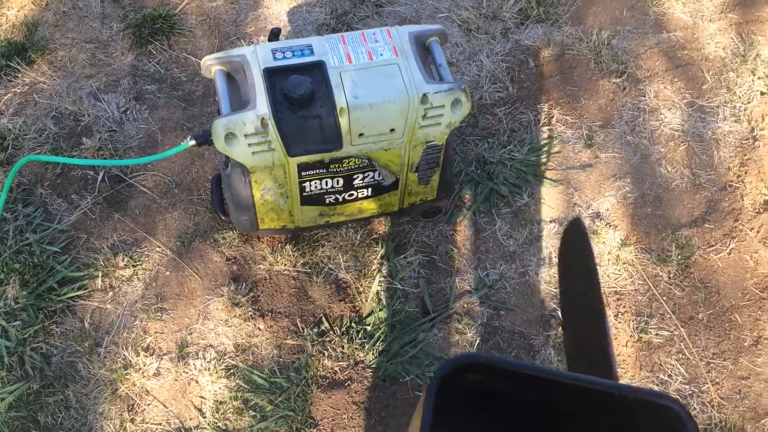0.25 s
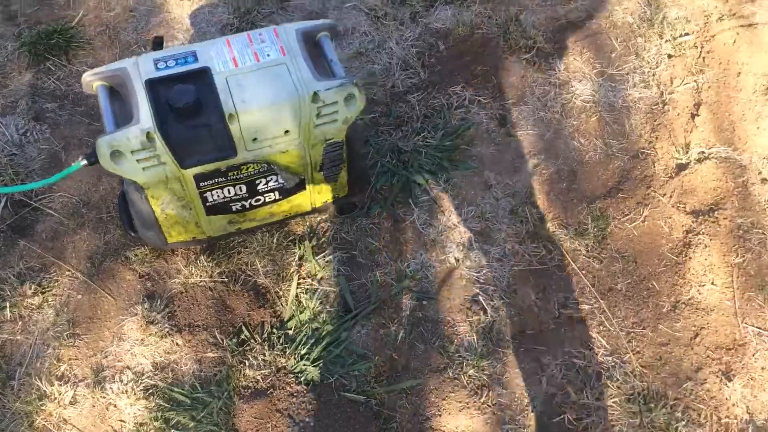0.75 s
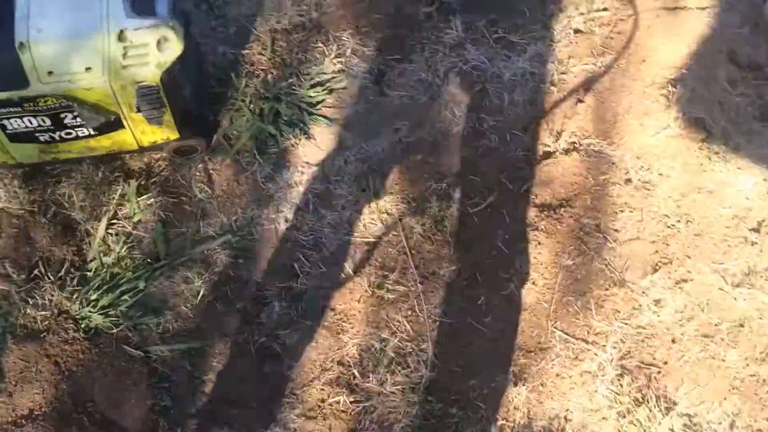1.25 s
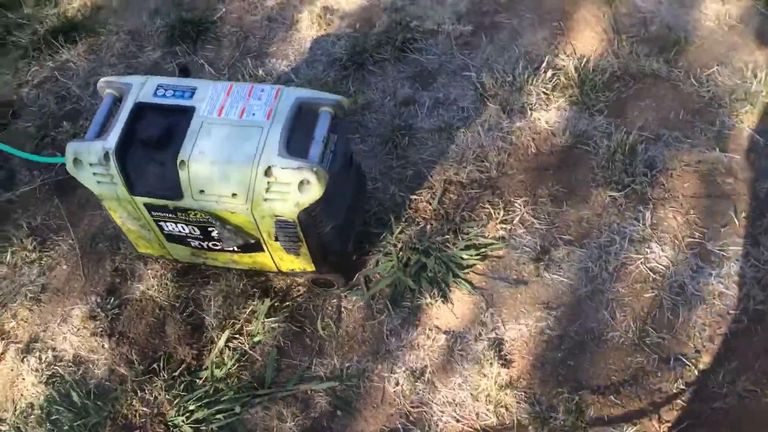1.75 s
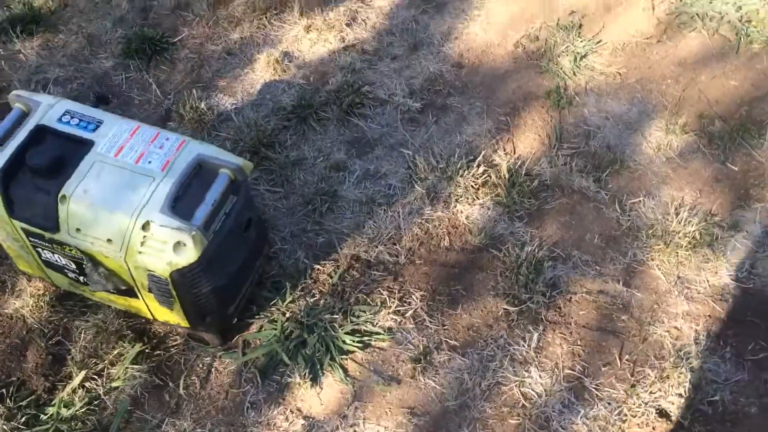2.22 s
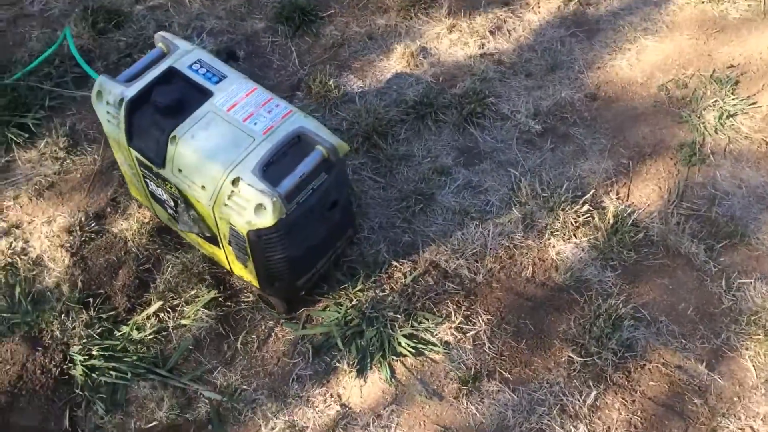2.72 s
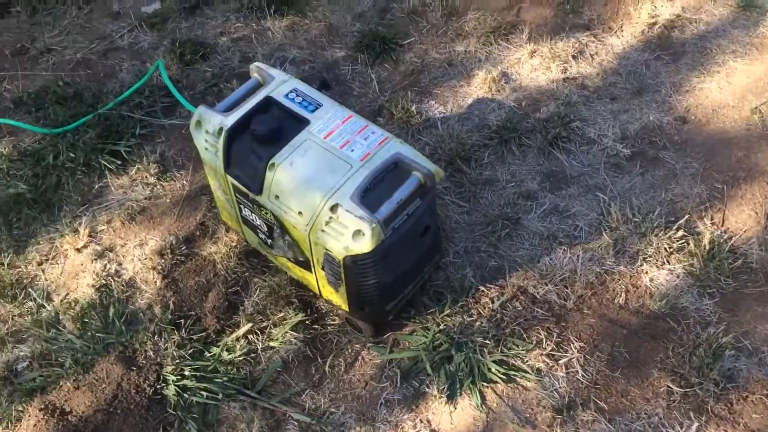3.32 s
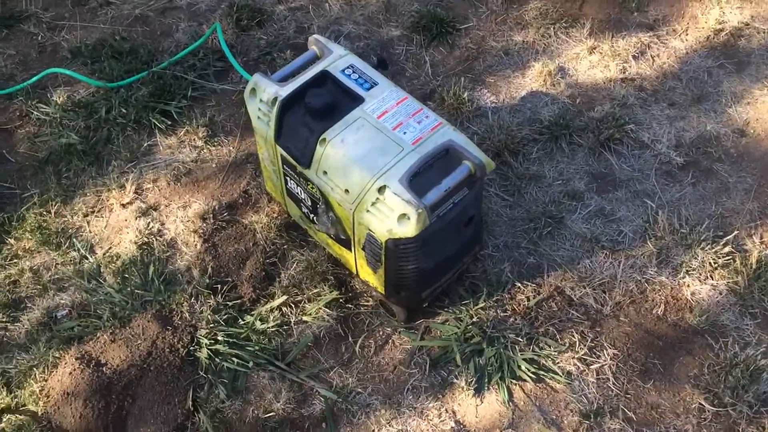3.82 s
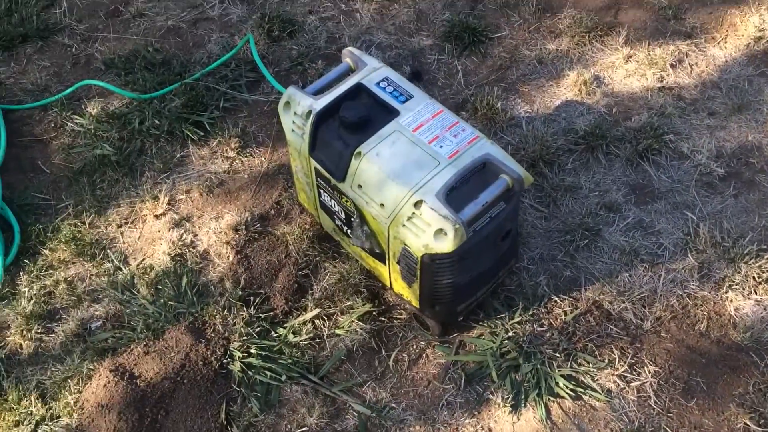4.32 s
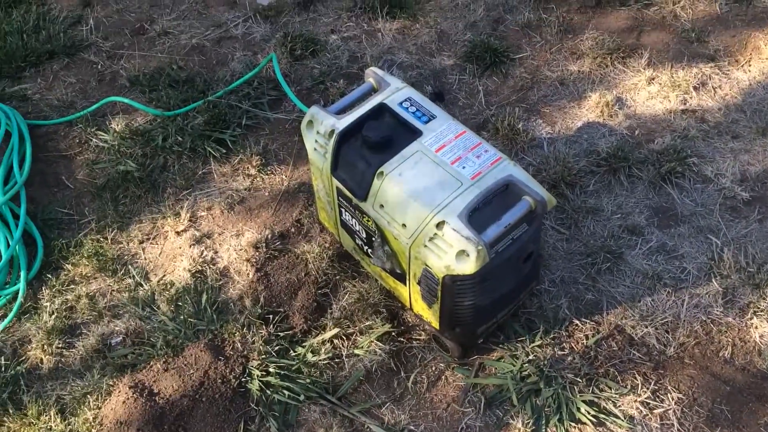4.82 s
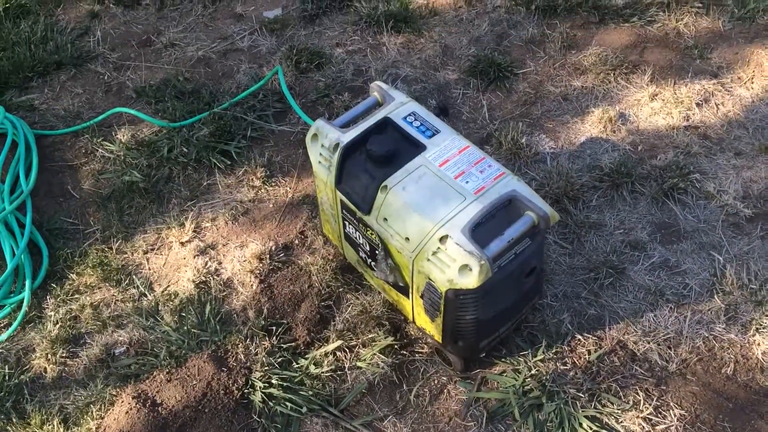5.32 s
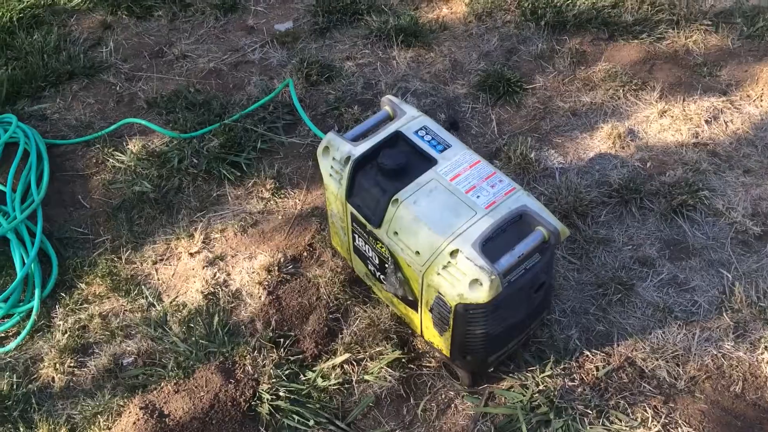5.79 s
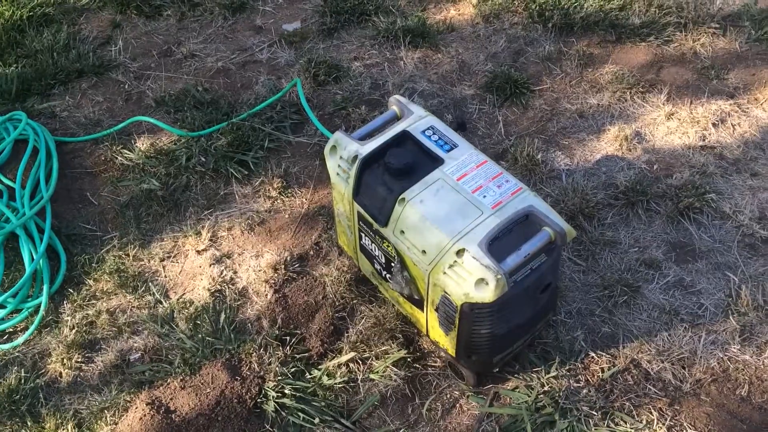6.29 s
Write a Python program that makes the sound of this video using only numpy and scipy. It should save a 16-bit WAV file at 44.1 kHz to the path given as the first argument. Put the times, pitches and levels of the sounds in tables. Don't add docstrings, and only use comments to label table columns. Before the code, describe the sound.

Outdoors on dry ground, a small petrol engine purrs fast with light metallic knocks and breathy air. Over it an electric saw's hard, nasal whine coasts downward, chain clatter slowing and fan rush dulling until only the engine remains. After a short rest the saw snatches on, sweeps up to its former pitch and holds, bright and loud, the loaded engine labouring then settling. Close handheld mono microphone, no echo.

```python
import sys
import numpy as np
from scipy import signal
from scipy.io import wavfile
from scipy.ndimage import uniform_filter1d

SR = 44100
rng = np.random.default_rng(int(sys.argv[2]) if len(sys.argv) > 2 else 0)


def dump(signal):
    limited = np.clip(np.atleast_2d(signal).T, -1, 1)
    pcm = np.round(limited * 32767).astype(np.int16)
    wavfile.write(sys.argv[1], SR, pcm)


def linear_from_db(decibels):
    return 10 ** (np.asarray(decibels, float) / 20)


N = 288855
T = np.arange(N) / SR

# time in seconds, firings per second.
FIRING = [(0, 34.6), (.14, 37.5), (.34, 38.8), (.8, 30.9), (1.07, 35.4), (1.2, 35.2), (1.38, 33.5),
          (1.6, 35.4), (2.1, 35.9), (3.26, 35.2), (3.41, 31.2), (3.6, 29), (3.83, 32.4), (4.1, 35.3),
          (4.55, 37.2), (5.25, 36.8), (5.41, 35.3), (5.71, 36.25)]
# time in seconds, load (0 idle, 1 steady, 2 labouring), overall level change in dB.
THROTTLE = [(0, 0.5, -7), (.5, 0.53, -2.5), (.9, 1.76, -1.7), (1.3, .08, -4), (1.8, .2, 0.1),
            (2.3, .02, 0.5), (3.25, 0.089, 0.7), (3.44, 1.75, 3), (3.6, 1.93, 1), (4.0, 1.75, 0.5),
            (4.3, 1.07, 1.3), (5.3, 0.97, -0.5), (5.45, 1.22, 2), (5.8, 1.04, 0), (6.55, 1.12, 0.5)]
# multiple of the firing rate, level in dB.
IDLE_ORDERS = [(1, -19), (2, -1), (3, -13), (4, 0), (5, -3), (6, -7), (7, -8), (8, -5), (9, -13), (10, -10),
               (11, -10), (12, -11)]
STEADY_ORDERS = [(1, -38), (2, -1), (3, -18), (4, -9.5), (5, -2.5), (6, -9), (7, -26), (8, -6), (9, -8),
                 (10, -20), (11, -14.5), (12, -4.5)]
LABOUR_ORDERS = [(1, -34), (2, -23), (3, -15), (4, -7), (5, -9.5), (6, -4.5), (7, 3), (8, -20), (9, -15),
                 (10, -7), (11, -16), (12, -10)]
# share of the cycle, frequency in Hz, width in Hz, level in dB.
KNOCKS = [(.06, 1270, 160, 3.5), (.1, 760, 200, -4), (.16, 2350, 220, -1), (.29, 2405, 254, 1.5),
          (.4, 646, 112, -4.5), (.4, 3480, 200, -18), (.48, 1180, 202, -4.5), (.54, 2300, 250, -4.5),
          (.87, 3460, 149, -6.5), (.93, 1426, 198, 0.5)]
# share of the cycle, level in dB.
PUFFS = [(.36, 8), (.48, -9), (.7, 1), (.92, -8)]
# frequency in Hz, density in dB per Hz.
BREATH = [(15, -44), (25, -25), (54, -2), (147, -11), (575, -8), (640, -9), (1010, -7.5), (1320, -7.5),
          (2020, -12.5), (2380, -12.5), (4290, -20), (8600, -24), (9580, -20), (15100, -30)]
# frequency in Hz, width in Hz, gain in dB.
COVER = [(160, 72, 5.5), (565, 63, -3), (1170, 240, -6.5), (2070, 180, -10), (2350, 200, 3),
         (3160, 200, -7), (3670, 160, 4.5), (7040, 200, 4.5), (8540, 900, -2), (9600, 300, 3)]
EXHAUST_DB, CASING_DB = [-36.5, -36.5, -28.5], [-31, -36.5, -30.5]

# multiple of the whine, dB in the first hold, dB in the second hold,
# dB per octave of speed, dB of motor strain.
WHINE_LAW = [(1, -22.5, -22, 14.5, 14), (.5, -47, -35, 10, -10), (3, -34, -41, 5, 9),
             (5, -35, -33.5, 11, -15), (1.5, -39.5, -43, 5, 3), (10, -42, -41, 17, 9),
             (11, -42, -42, 17, 0)]
# frequency in Hz, width in Hz, gain in dB.
WHINE_PEAKS = [
    [(895, 170, 5.5)],
    [(416, 45, 18)],
    [(2570, 400, 4), (1910, 600, 4), (950, 250, 6)],
    [(4520, 290, 6.5), (3500, 1100, -8), (2720, 240, 16), (2300, 170, 7)],
    [(1160, 200, 16.5)],
    [(8400, 900, 12), (9300, 120, 1)],
    [(10200, 330, 9)],
]
POWERED = [0.83, 0.22, 0.034, 1, 0.79, 1, 1]
# level flutter in dB, phase flutter in radians.
UNSTEADY = [(.9, .06), (1.5, .1), (2.2, .3), (1.4, .15), (2, .2), (2, .3), (2, .3)]
# start in seconds, end in seconds, change in dB.
GRIP = [
    (4.4, 4.97, -9),
    (5.0, 5.5, 2.5),
    (5.05, 5.75, 2.2),
    (6.3, 6.7, 1.5),
]
# multiples of the whine, then levels in dB to the whine.
ROTOR_MULTIPLES = [.9315, .9085, 1.094, 2, 2.5, 4, 5.5, 10.5, 11.5]
ROTOR_DB = [-7, -29, -15, -28, -21, -23, -23, -20, -16]
# multiples of the whine, then levels in dB to the clatter.
LINK_MULTIPLES = [1.863, 2.795, 4.2, 5.69]
LINK_DB = [-21, -19.5, -17.5, -23]
# frequency in Hz, density in dB per Hz.
CLATTER = [(88, -56), (150, -34), (243, -36), (302, -33), (371, -23), (476, -15.5), (531, -19.5),
           (791, -13), (945, -11.5), (1110, -10), (2040, -12), (2410, -13), (4000, -23.5), (5200, -57),
           (8800, -120)]
# frequency in Hz, width in Hz, gain in dB.
HOUSING = [(670, 104, 7.5), (846, 30, 8), (1180, 115, 0), (1836, 88, 3.5), (2300, 150, 5), (2850, 170, 3.5)]
# frequency in Hz, width in Hz, gain in dB.
RINGING = [(900, 170, 5), (1200, 250, -3), (2250, 130, 6)]
# frequency in Hz, share.
GROWL = [(450, 0), (700, .6), (880, 1.2), (1100, 0)]
# time in seconds, clatter in dB, growl in dB, length in seconds.
SNATCHES = [
    (.94, -2.5, 4, 0.11),
    (1.433, 0.5, 0.5, 0.064),
    (3.322, -1, 4, 0.013),
    (3.341, -3, 4, .007),
    (3.346, 5, 0, 0.0068),
    (3.383, -5.5, 5, 0.017),
    (3.805, -4, 9, 0.1),
]
# frequency in Hz, density in dB per Hz.
RUSH = [(1650, -22.5), (2800, 2), (3160, -6.5), (3630, -5.5), (3930, -5), (4520, -4.5), (4620, -4.5),
        (4920, -4), (5030, -4), (5550, -0.5), (7150, -4), (9680, -3.5), (11700, -8), (15100, -9)]
# frequency in Hz, width in Hz, gain in dB.
VENTS = [(3900, 340, 0.5), (5250, 510, 1.5), (6050, 230, 2), (6420, 95, 3.5), (11300, 790, 2)]
# frequency in Hz, width in Hz, gain in dB.
SINGING = [(6450, 110, 13), (12600, 5000, -1)]
# time in seconds, nearness of the chain bar in dB, of the fan vents in dB.
HELD = [(0, 3.5, 4.5), (.4, 3, 4), (.8, 1.5, 5), (1.15, 3.5, 5), (1.36, 2.5, 5), (1.43, 0.5, 3),
        (1.7, 3, 1.5), (1.92, 4, 0), (3.3, 1, -1), (3.92, -0.5, .7), (4.2, -0.5, -1.2), (4.6, 0, 0.6),
        (5.0, 1, 0), (5.4, 0.5, 0.2), (5.7, 1.3, -0.3), (6.55, 0, -0.5)]
# dB at full speed, power of the speed, speed where it dies in Hz, dB of strain, share of switch-on fade.
CLATTER_LAW, RUSH_LAW = (-22, 0.5, 110, 9, .85), (-21.5, 0.91, 96, 11, 1.06)
FIRST_HZ = 941
ON_S, TRIGGER_S = 3.236, 3.258

# time in seconds, low edge in Hz, high edge in Hz, level in dB.
SPLITS = [(.029, 9600, 13300, -26), (.029, 4200, 5300, -31), (.237, 11000, 13300, -31),
          (1.004, 12400, 13900, -40), (5.021, 5700, 8400, -29), (5.021, 13100, 14600, -40),
          (5.067, 5200, 6500, -31), (5.439, 5100, 6500, -29), (6.042, 6300, 7700, -34),
          (6.53, 7600, 9100, -33)]


def evened(x):
    return x / np.sqrt(np.mean(x ** 2) + 1e-20)


def columns(rows, t=T):
    s, *values = np.transpose(rows)
    return [np.interp(t, s, v) for v in values]


def resonances(bumps, hz):
    return sum(db / (1 + (2 * (hz - centre) / width) ** 2) for centre, width, db in bumps)


def colour(points, bumps, hz):
    f, db = np.transpose(points)
    return np.interp(np.log(hz + 1), np.log(f), db) + resonances(bumps, hz)


def wander(per_s):
    steps = rng.standard_normal(int(N / SR * 400) + 4)
    return np.interp(T * per_s, np.arange(len(steps)), steps) * 1.2


def shaped(drive, shape_db, patchy_db):
    hz, t, z = signal.stft(drive, SR, nperseg=1024, noverlap=768)
    patches = uniform_filter1d(rng.standard_normal(z.shape), 6, 0)
    patches = evened(uniform_filter1d(patches, 10, 1))
    z = z * linear_from_db(shape_db(hz[:, None], t) + patchy_db * patches)
    return signal.istft(z, SR, nperseg=1024, noverlap=768)[1][:N]


def ticks(turns):
    return np.diff(np.floor(turns), prepend=np.floor(turns[0]))


def exhaust_thump(turns, load):
    out = 0
    for (k, idle), (_, steady), (_, labour) in zip(IDLE_ORDERS, STEADY_ORDERS, LABOUR_ORDERS):
        db = np.interp(load, np.arange(3), [idle, steady, labour]) + 1.4 * wander(14)
        out += linear_from_db(db) * np.cos(2 * np.pi * k * (turns - .49) + .14 * k ** 2)
    return out


def blow(turns, share, db):
    return linear_from_db(db + 1.5 * wander(100)) * ticks(turns - share + .001 * wander(80))


def casing_knocks(turns):
    ring_t = T[:900]
    soft = 1 - np.exp(-ring_t / 0.00022)
    out = 0
    for share, f, width, db in KNOCKS:
        ring = soft * np.exp(-np.pi * width * ring_t) * np.sin(2 * np.pi * f * ring_t)
        out += signal.oaconvolve(blow(turns, share, db), ring)[:N]
    return out


def engine_air(turns):
    puffs = sum(blow(turns, share, db) for share, db in PUFFS)
    puffs = signal.oaconvolve(puffs, np.exp(-T[:900] / 0.0039))[:N]
    drive = rng.standard_normal(N) * (4.2 + evened(puffs))
    return shaped(drive, lambda f, t: colour(BREATH, COVER, f), 1.4)


def generator():
    hz, = columns(FIRING)
    load, overall_db = columns(THROTTLE)
    exhaust_db = np.interp(load, np.arange(3), EXHAUST_DB) + overall_db
    casing_db = np.interp(load, np.arange(3), CASING_DB) + overall_db
    turns = np.cumsum(hz * (1 + 0.003027 * wander(12))) / SR
    casing = linear_from_db(-2.5) * evened(casing_knocks(turns)) + evened(engine_air(turns))
    return linear_from_db(exhaust_db + 1.2) * exhaust_thump(turns, load) + linear_from_db(casing_db) * casing


def rotor():
    off_s, drag_per_s, friction_hz, rest_hz = .136, .84, 108, 70
    second_hz, climb_per_s, creep_hz_per_s, bite_s = 944.2, 4.25, 4.25, .13
    powered = T > TRIGGER_S
    coast = (FIRST_HZ + friction_hz) * np.exp(-drag_per_s * np.maximum(T - off_s, 0)) - friction_hz
    strain = powered * np.exp(-climb_per_s * np.maximum(T - ON_S, 0))
    climb = (second_hz + creep_hz_per_s * (T - ON_S)) * (1 - strain)
    bite_db = powered * 20 * np.log10(np.clip((T - TRIGGER_S) / bite_s, 1e-3, 1))
    return np.maximum(np.where(powered, climb, coast), rest_hz), strain, bite_db


def slowness(hz, t):
    return np.interp(t, T, 1 - hz / FIRST_HZ)


def noise_db(law, hz, strain, bite_db):
    full_db, power, dies_hz, strain_db, fade = law
    moving = (hz - dies_hz) / (FIRST_HZ - dies_hz) + 0.22 * strain
    speed_db = np.where(moving > 0, full_db + 20 * power * np.log10(abs(moving) + 1e-4), -90)
    return speed_db + strain_db * np.sqrt(strain) + fade * bite_db


def whine_db(hz, strain):
    grip_s = 0.16
    grip_db = sum(db * np.clip(np.minimum(T - a, b - T) / grip_s + .5, 0, 1) for a, b, db in GRIP)
    levels = []
    for (k, first_db, second_db, octave_db, strain_db), peaks, share in zip(WHINE_LAW, WHINE_PEAKS, POWERED):
        db = np.where(T < ON_S, first_db, second_db) + octave_db * np.log2(hz / FIRST_HZ) + strain_db * strain
        db = db + .25 * np.minimum(max(k / 2, 1) * hz - 425 * (1 + 0.19 * strain), 0)
        db = db + grip_db * (k == 5)
        levels.append(db + np.where(T < ON_S, 1, share) * resonances(peaks, k * hz))
    return levels


def fan_rush(hz, strain, angle):
    chop = 0.095 * np.cos(angle / 2) + 0.08 * np.cos(angle * ROTOR_MULTIPLES[0] / 10)
    air = rng.standard_normal(N) * (1 + chop + 0.035 * wander(200))

    def spectrum(f, t):
        tilt = (0.88 - 4 * slowness(hz, t)) * np.log2((f + 1) / 6000)
        singing = np.interp(t, T, np.sqrt(strain)) * resonances(SINGING, f)
        return colour(RUSH[:-1], VENTS, f) + tilt + singing

    return shaped(air, spectrum, 1.28)


def link_clatter(hz, angle, sag_db):
    chain_angle = angle * ROTOR_MULTIPLES[0]
    links = ticks(chain_angle / (2 * np.pi) + .12 * wander(300)) * linear_from_db(9.7 * rng.standard_normal(N))
    loose = (rng.random(N) < 1500 / SR) * linear_from_db(1.8 * rng.exponential(1, N))
    loose = loose * rng.choice([-1, 1], N)
    slack = .35 * np.clip(950 / hz, 1, 2.2)
    drive = 0.15 * evened(links - links.mean()) + slack * evened(loose) + rng.standard_normal(N)
    drive *= 1 + 0.13 * np.cos(chain_angle / 10) + 0.12 * wander(40)

    def spectrum(f, t):
        slow = slowness(hz, t)
        growl_db = 1.5 + 2 * slow + np.interp(t, T, sag_db)
        ringing = slow * (t < ON_S) * resonances(RINGING, f)
        return ringing + colour(CLATTER, HOUSING, f) + growl_db * colour(GROWL, [], f)

    return shaped(drive, spectrum, 0.91)


def gliding_tones(multiples, table_db, level_db, hz, angle):
    out = 0
    for k, db in zip(multiples, table_db):
        swell_db = 1.2 * colour([(400, -15), (800, 0)], HOUSING, k * hz) * (abs(k - 1) > .2)
        out += linear_from_db(level_db + db + swell_db + 1.5 * wander(20)) * np.sin(k * angle + 0.12 * wander(15))
    return out


def rotor_whine(tones_db, angle):
    out = 0
    for (k, *_), db, (flutter_db, smear) in zip(WHINE_LAW, tones_db, UNSTEADY):
        out += np.sqrt(2) * linear_from_db(db + flutter_db * wander(40)) * np.sin(k * angle + smear * wander(60))
    return out


def saw():
    hz, strain, bite_db = rotor()
    angle = 2 * np.pi * np.cumsum(hz * (1 + .0005 * wander(30))) / SR
    bar_db, vents_db = columns(HELD)
    snatch_db, sag_db = sum(np.outer(db, np.exp(-((T - s) / length) ** 2)) for s, *db, length in SNATCHES)
    clatter_db = noise_db(CLATTER_LAW, hz, strain, bite_db) + bar_db + snatch_db
    rush_db = noise_db(RUSH_LAW, hz, strain, bite_db) + vents_db
    tones_db = whine_db(hz, strain)
    links_db = clatter_db + 3 * np.clip(1.6 - hz / 500, 0, 1)
    out = rotor_whine(tones_db, angle)
    out += gliding_tones(ROTOR_MULTIPLES, ROTOR_DB, tones_db[0], hz, angle)
    out += gliding_tones(LINK_MULTIPLES, LINK_DB, links_db, hz, angle)
    out += linear_from_db(clatter_db) * evened(link_clatter(hz, angle, sag_db))
    return out + linear_from_db(rush_db + 2.5) * evened(fan_rush(hz, strain, angle))


def scene():
    return np.tile(generator() + saw(), (2, 1))


def band_limit(x):
    return signal.sosfilt(signal.butter(12, 16320, fs=SR, output="sos"), x)


def record(dry):
    side = np.zeros(N + 2048)
    for s, low_hz, high_hz, db in SPLITS:
        bandpass = signal.butter(6, [low_hz, high_hz], "bandpass", fs=SR, output="sos")
        band = signal.sosfilt(bandpass, rng.standard_normal(2048))
        at = round(s * SR) - 1024
        side[at:at + 2048] += linear_from_db(db) * evened(band) * signal.windows.tukey(2048, .5)
    bassless = signal.sosfilt(signal.butter(2, 38, "highpass", fs=SR, output="sos"), dry)
    pair = 0.91 * np.tanh(bassless / 0.88) + side[:N] * np.array([[1], [-1]])
    edge = signal.firwin(1023, 15330, window=("kaiser", 10), fs=SR)
    return band_limit(signal.oaconvolve(pair, edge[None], "same"))


dry = scene()
out = record(dry)
dump(out)
```